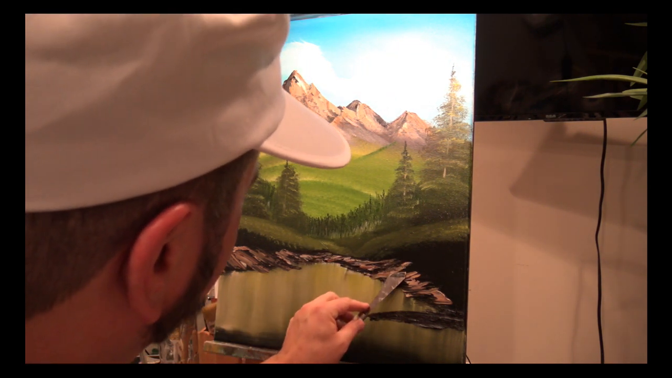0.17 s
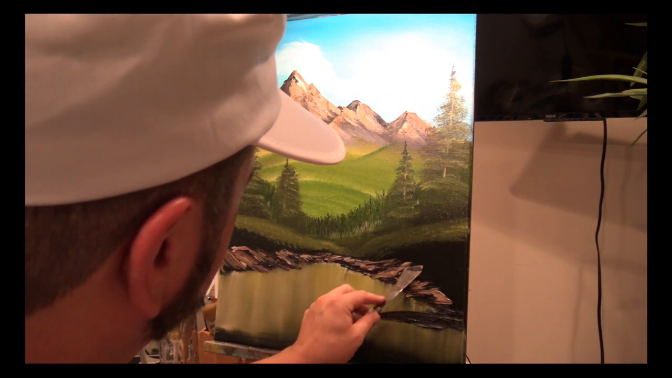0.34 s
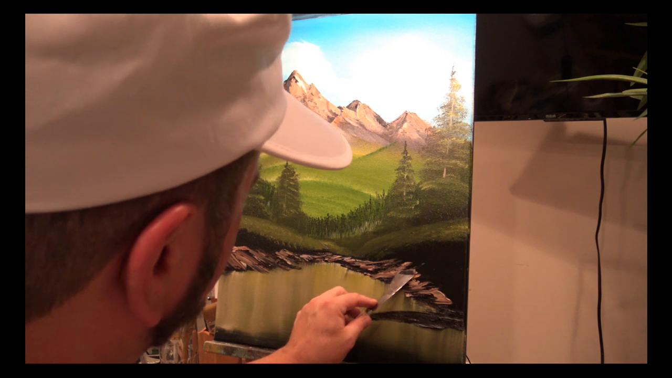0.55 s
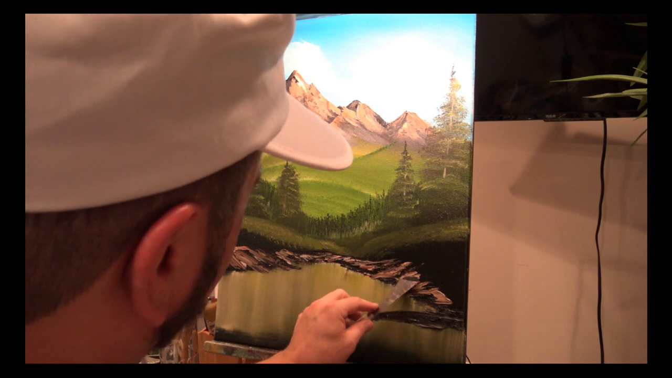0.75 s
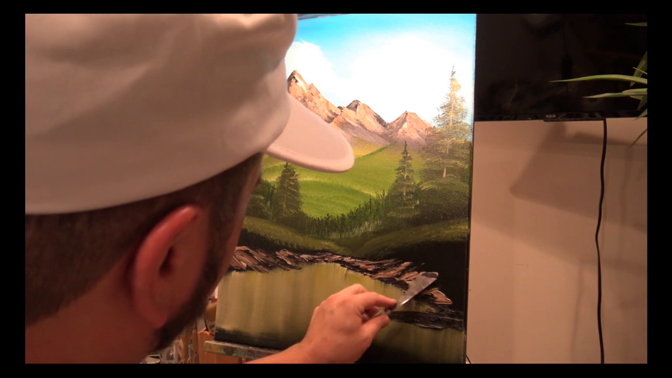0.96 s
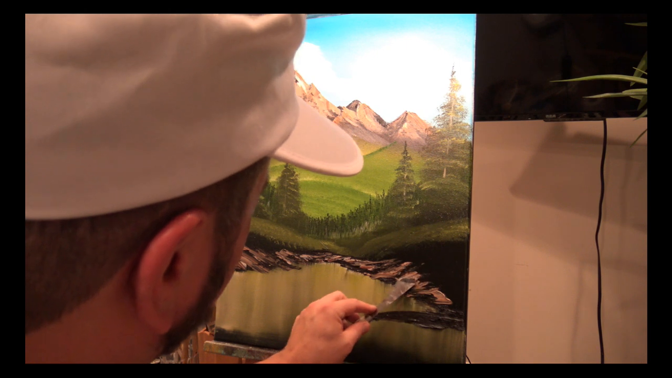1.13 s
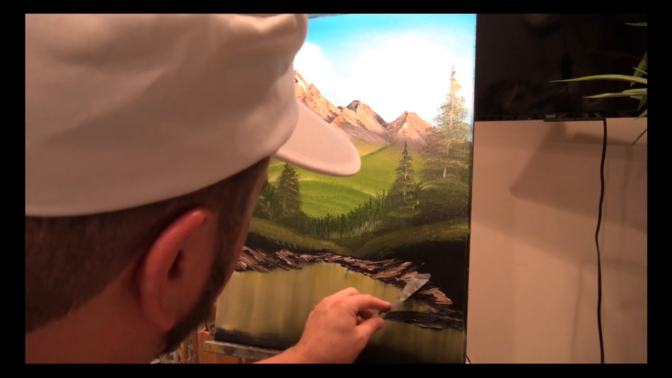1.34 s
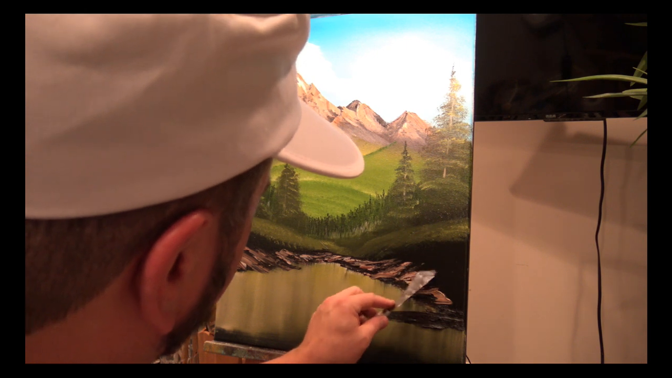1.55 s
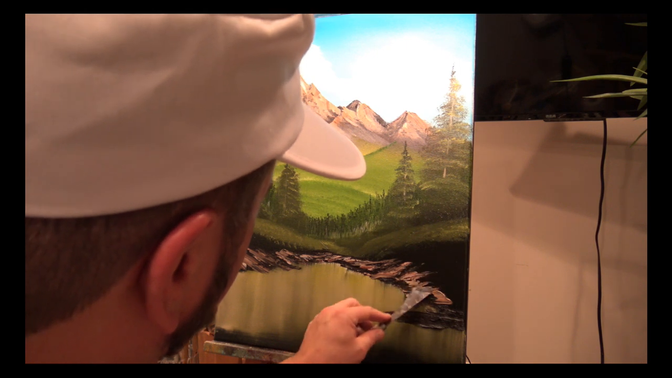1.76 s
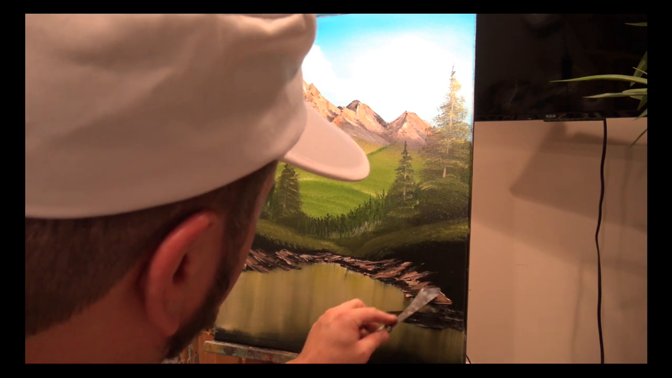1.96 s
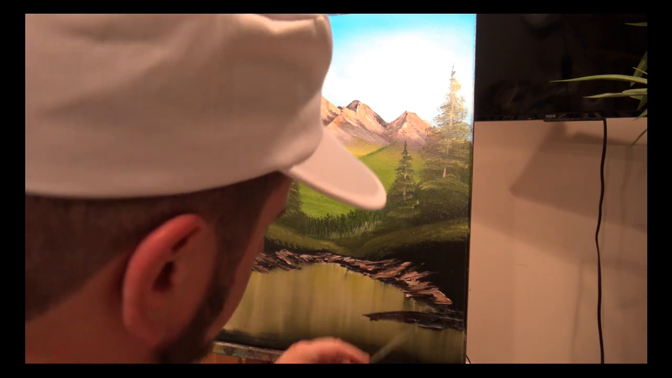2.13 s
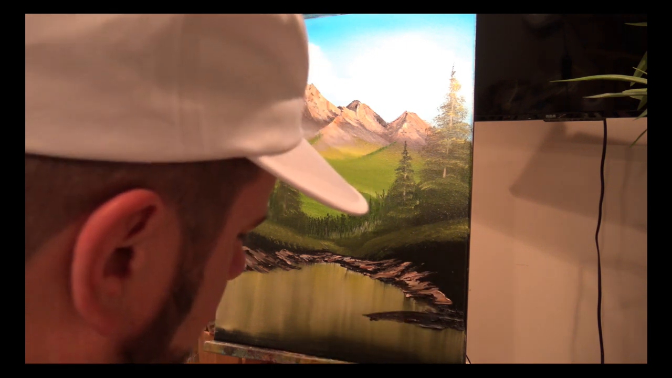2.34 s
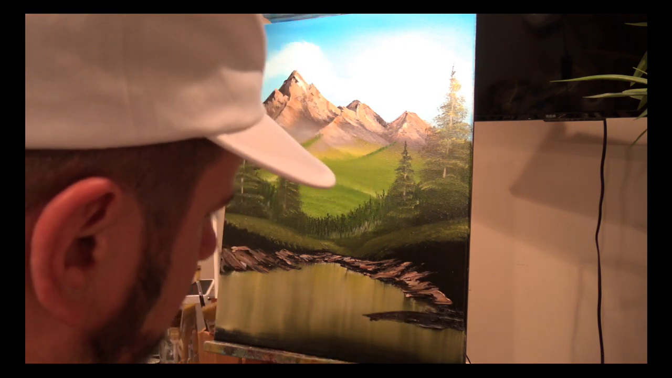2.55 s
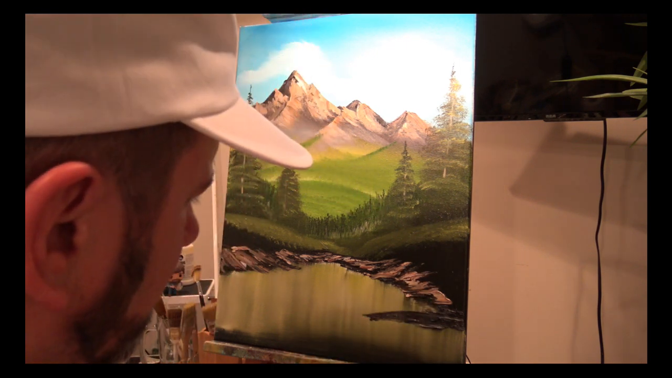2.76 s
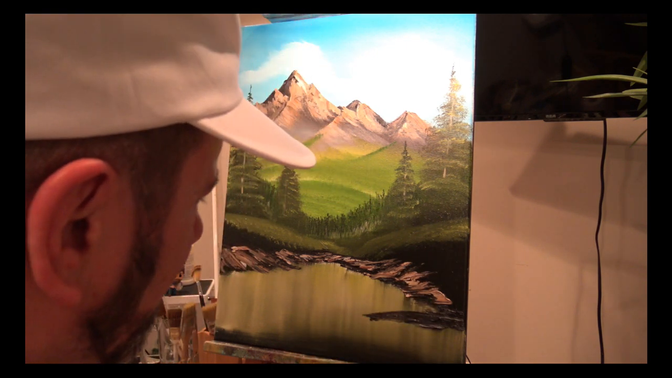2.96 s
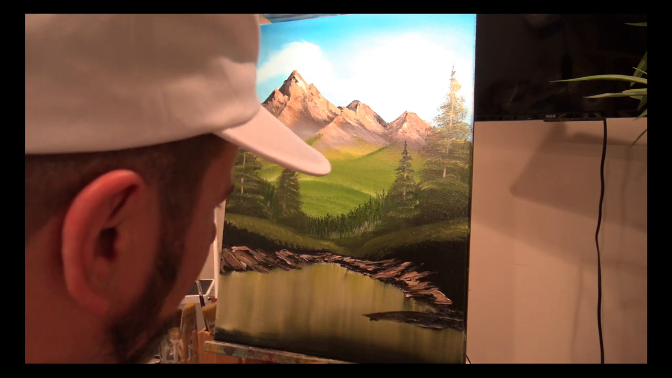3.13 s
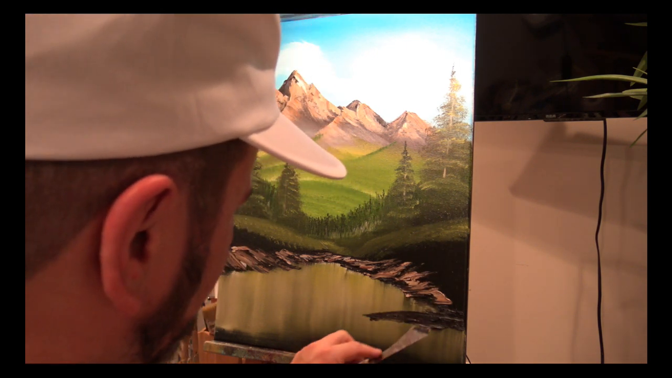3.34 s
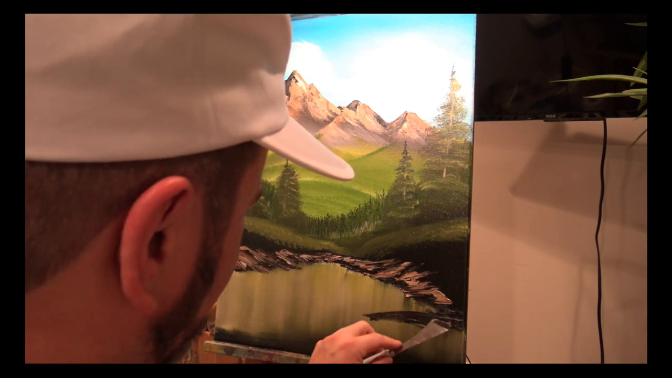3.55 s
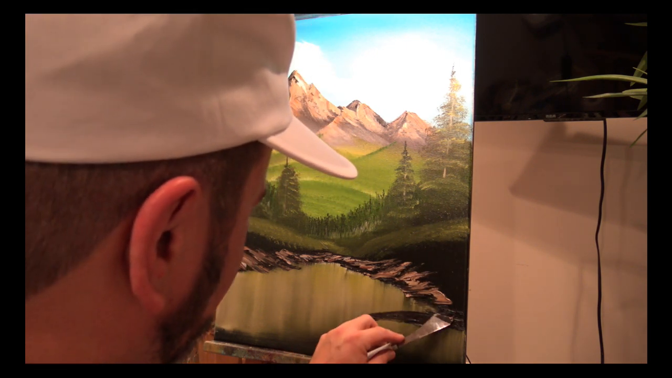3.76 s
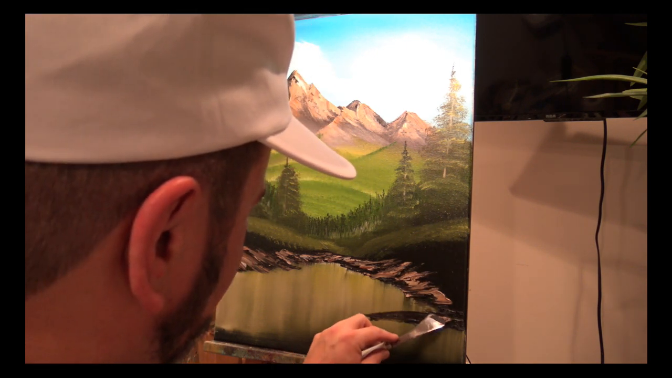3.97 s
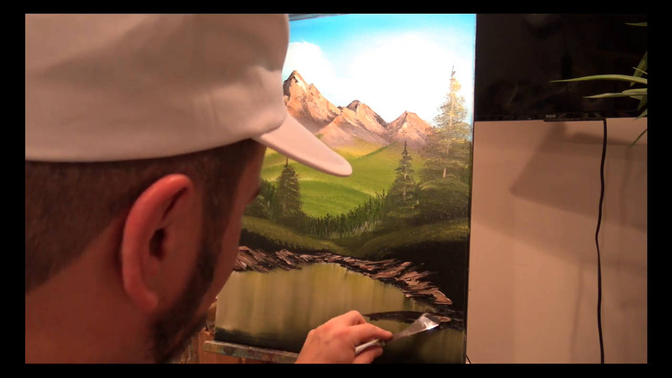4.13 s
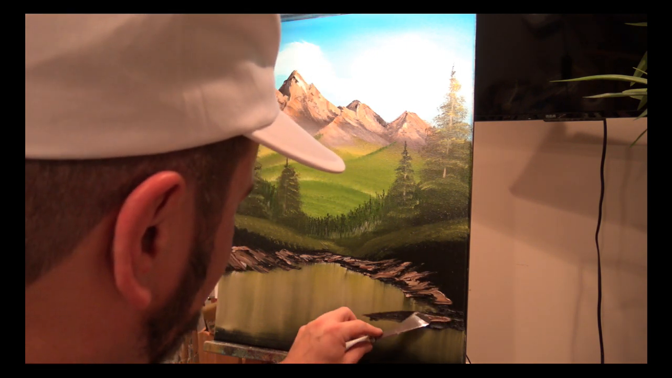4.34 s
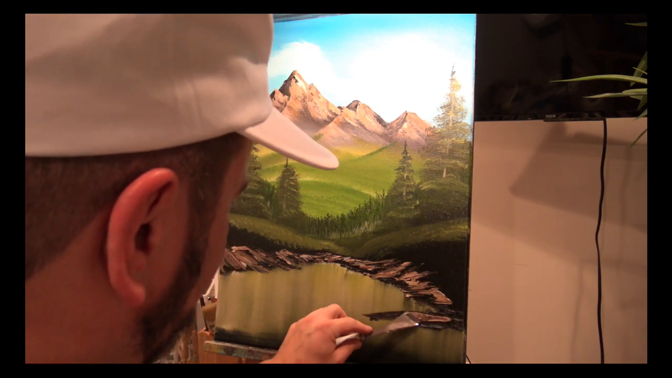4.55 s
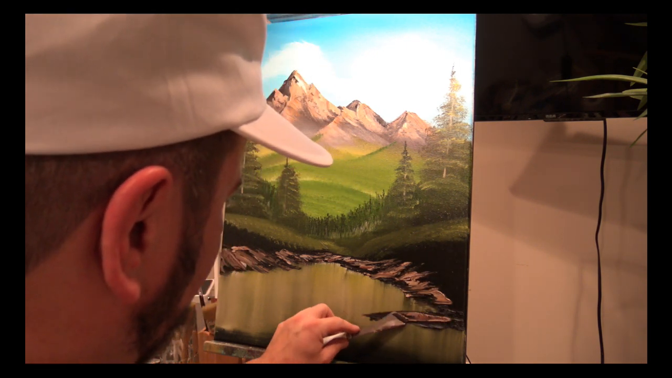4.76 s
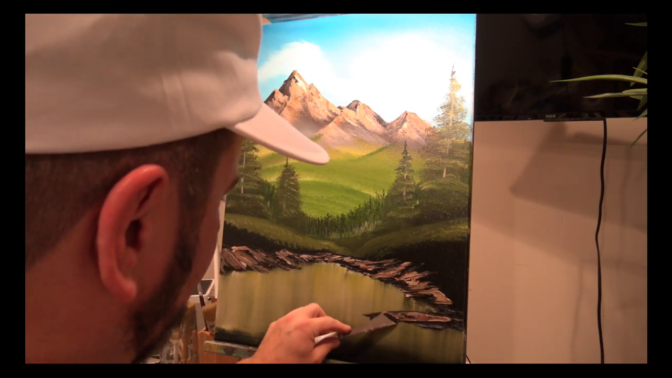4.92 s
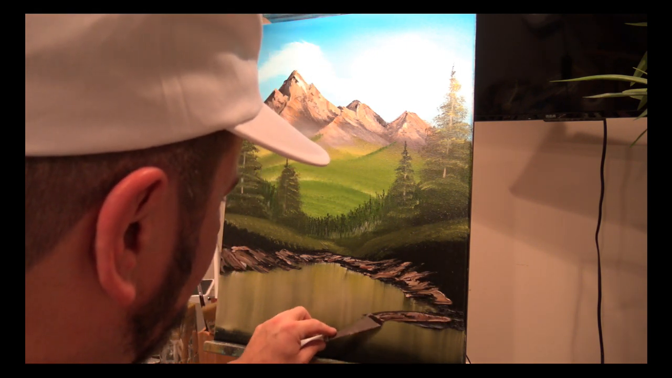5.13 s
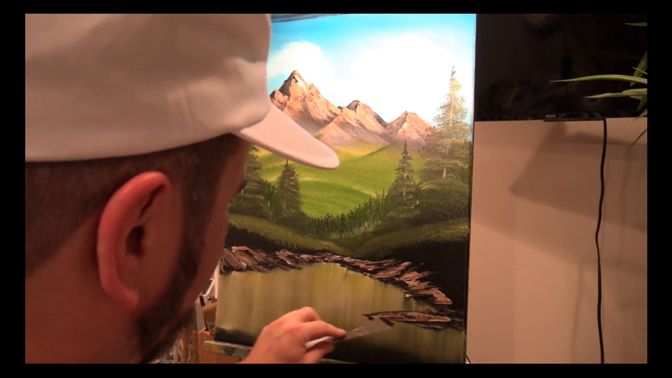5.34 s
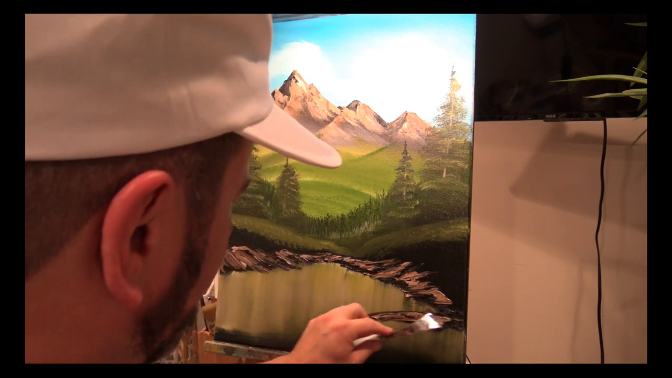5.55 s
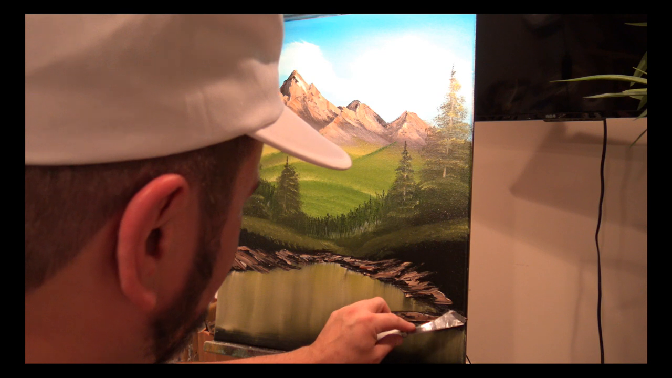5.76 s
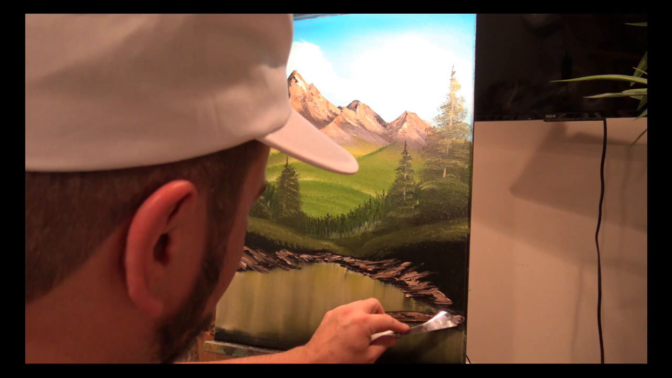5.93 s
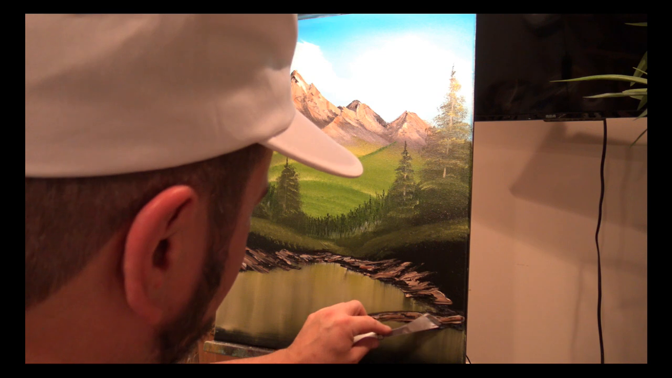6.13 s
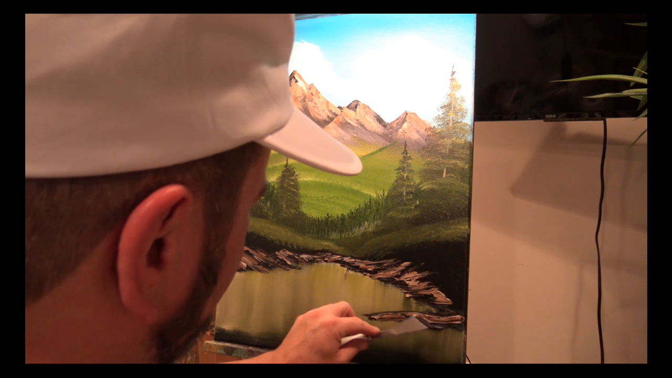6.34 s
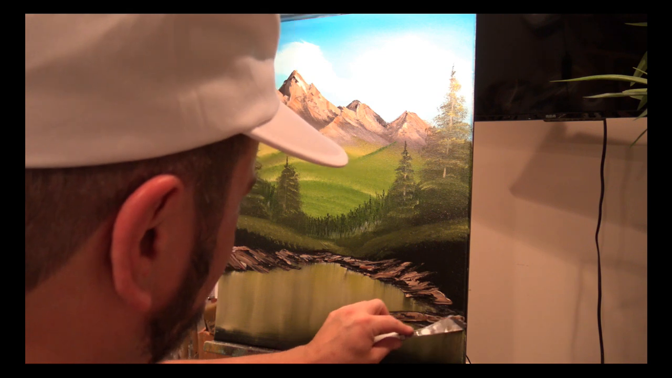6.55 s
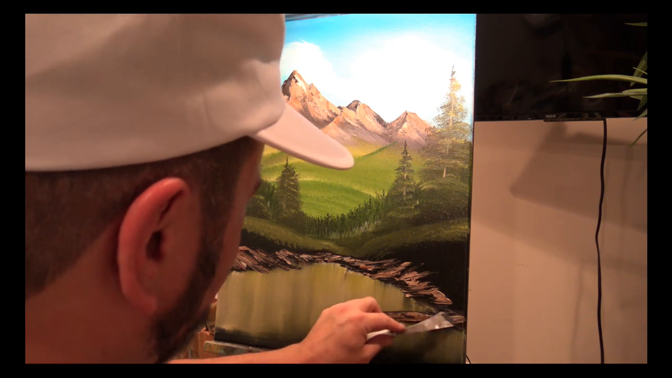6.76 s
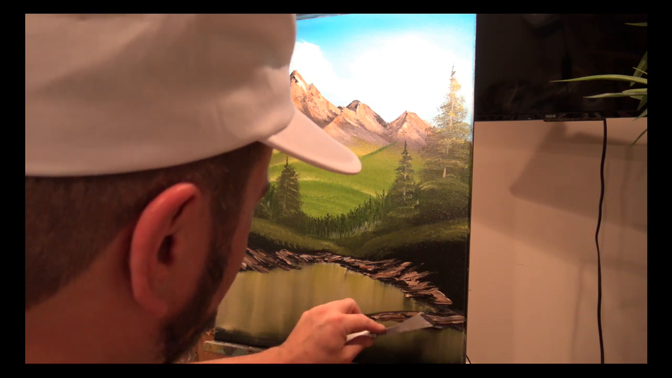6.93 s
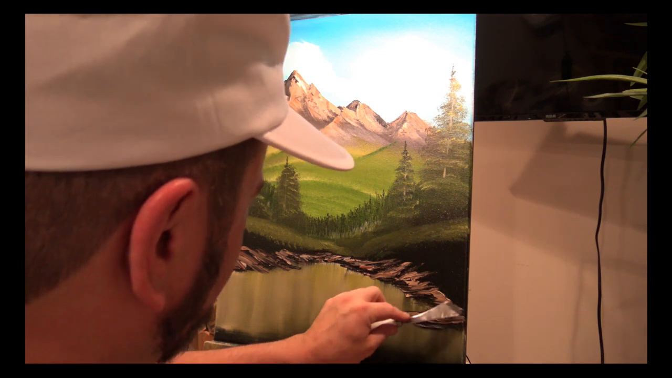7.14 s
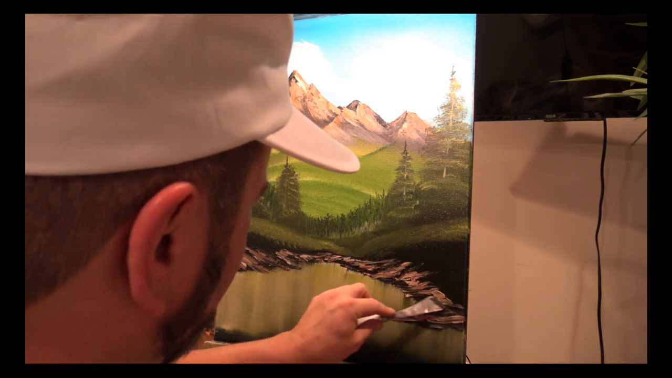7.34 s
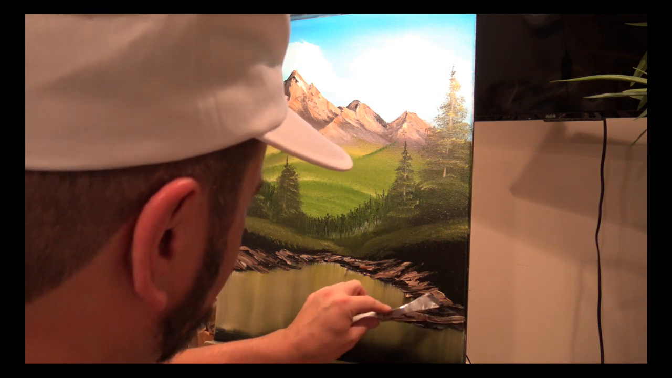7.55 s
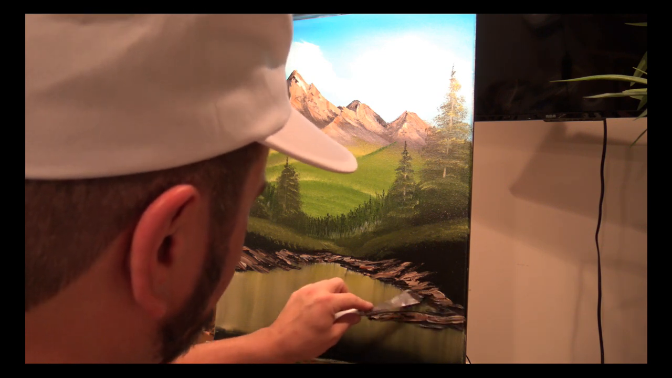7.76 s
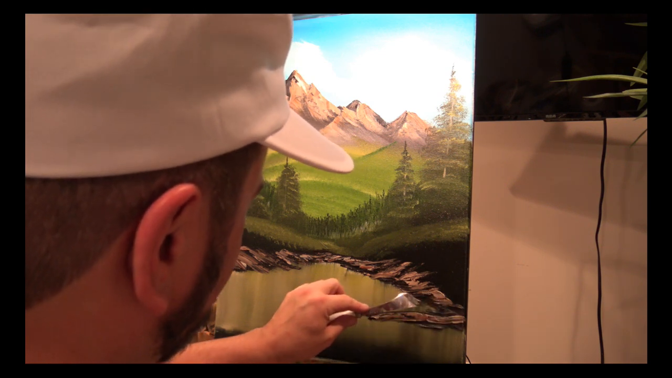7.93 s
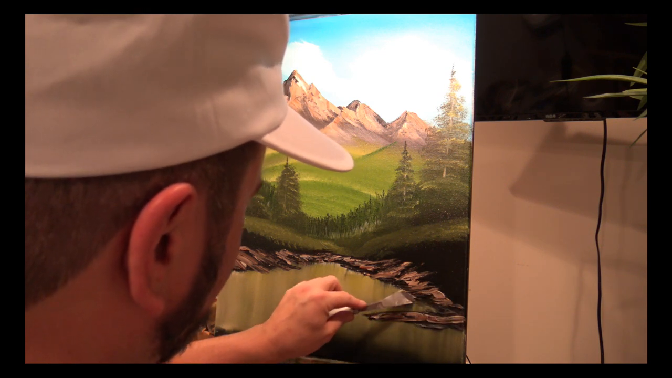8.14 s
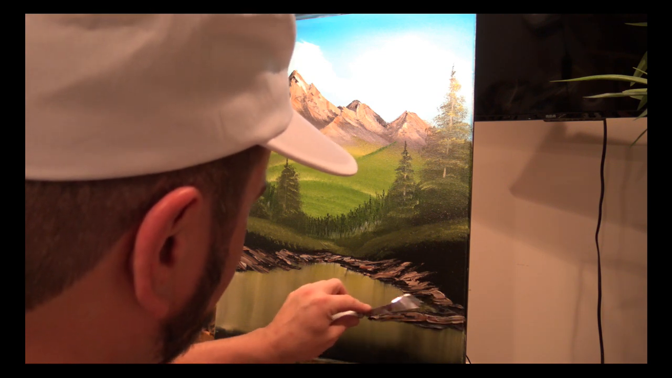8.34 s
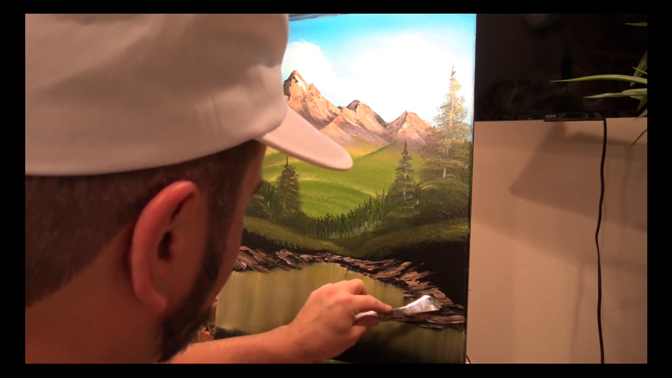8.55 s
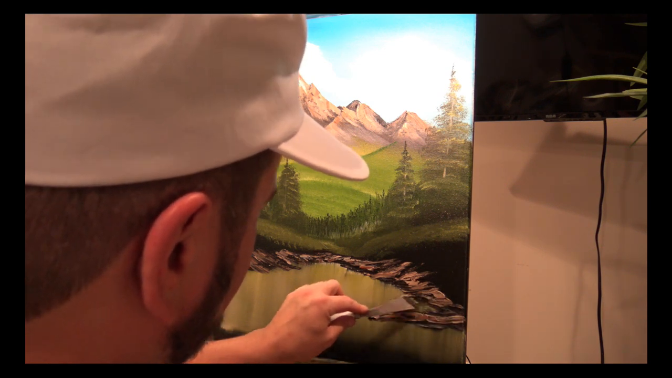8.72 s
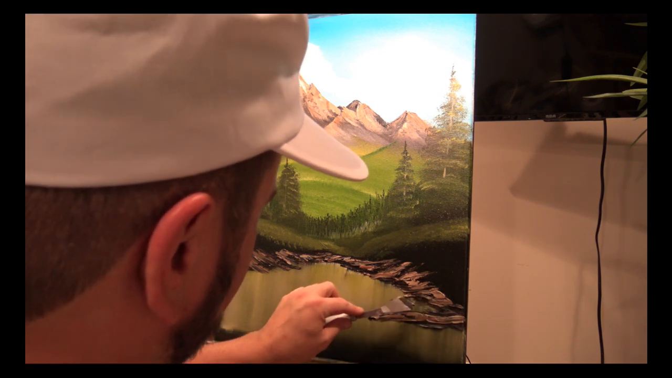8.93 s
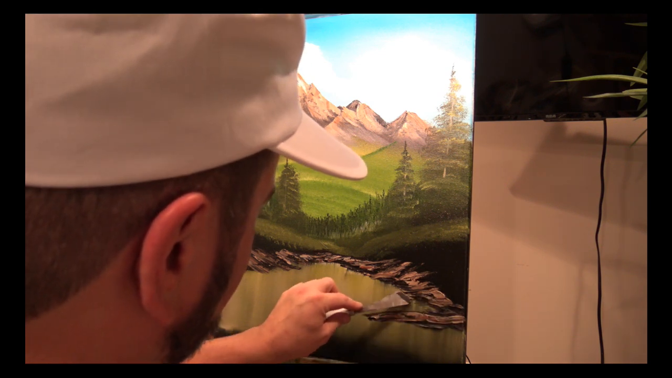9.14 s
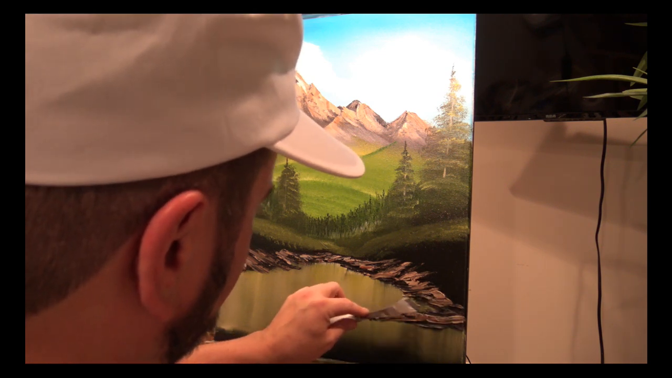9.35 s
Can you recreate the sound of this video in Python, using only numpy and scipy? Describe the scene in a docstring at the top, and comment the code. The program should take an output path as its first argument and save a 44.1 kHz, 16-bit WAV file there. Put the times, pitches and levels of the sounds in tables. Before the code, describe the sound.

A metal palette knife scrapes oil paint over a drumming canvas, interrupted by three sharp slaps and singing scrapes on a hard palette.

```python
"""A steel palette knife drags oil paint over a stretched canvas in short strokes, in a quiet room.
Random slips of the edge ring the canvas low and hiss high; single resonances stand out briefly, from low
booms and a knock to higher tones; landings tap and knock. Between two passages the knife is slapped onto a
hard palette and drawn across it three times, singing; then it ticks off sticky paint.
Steady hum and air, a rustling sleeve and handling rumble lie below."""
import sys
import numpy as np
from scipy import signal
from scipy.fft import rfft, irfft, next_fast_len
from scipy.io import wavfile

SR = 44100
rng = np.random.default_rng(int(sys.argv[2]) if len(sys.argv) > 2 else 0)


def wav_record(signal):
    """Record a signal, one row per channel, as 16-bit PCM in the file named by sys.argv[1]."""
    frames = np.transpose(np.atleast_2d(signal))
    bounded = np.clip(frames, -1, 1)
    # unit amplitude maps onto the largest positive 16-bit level
    quanta = np.round(bounded * 32767).astype(np.int16)
    wavfile.write(sys.argv[1], SR, quanta)


N = 418509

# canvas resonances: centre_hz, width_hz, relative_db
CANVAS_MODES = [(122, 35, -3), (330, 55, 0), (405, 40, -1), (482, 48, 0), (770, 70, -7), (900, 50, -8),
                (1210, 60, -9), (1440, 55, -5), (1700, 90, -12), (2080, 90, -13)]
# palette board resonances: centre_hz, width_hz, relative_db
BOARD_MODES = [(480, 260, -7), (822, 85, 2.5), (1127, 180, -8), (1460, 51, 3.5), (2345, 100, -8.5)]
# steel blade resonances: centre_hz, width_hz, relative_db
BLADE_MODES = [(4100, 500, -11), (6150, 250, -3), (7700, 200, -3), (8370, 200, -2), (9700, 400, -5),
               (11500, 2000, -9)]


def from_db(db):
    """Decibels to amplitude gain."""
    return 10 ** (np.asarray(db) / 20)


def rms_one(x):
    """Scale to rms 1."""
    return x / np.sqrt(np.mean(x ** 2) + 1e-20)


def lowpass(x, cut_hz):
    """Second-order low-pass run both ways, so without delay."""
    return signal.sosfiltfilt(signal.butter(2, cut_hz, fs=SR, output="sos"), x)


def gains(rows):
    """One gain curve per dB column; -120 dB outside the table."""
    s, *columns = np.transpose(rows)
    time_s = np.arange(N) / SR
    return [from_db(np.interp(time_s, s, db, left=-120, right=-120)) for db in columns]


def drift(rate_hz):
    """Slow random curve of rms 1: noise through two equal poles, computed every 40 samples."""
    r = np.exp(-80 * np.pi * rate_hz / SR)
    noise = rng.standard_normal(N // 40 + 2002)
    slow = signal.lfilter([1], [1, -2 * r, r * r], noise)[2000:]   # drop the filter's start
    return np.interp(np.arange(N) / 40, np.arange(len(slow)), rms_one(slow))


def catches(per_s, spread_db, clump_db):
    """Tiny slips of the edge: impulses at random moments, uneven in size, loud in clumps; rms 1."""
    sizes = from_db(spread_db * np.minimum(rng.exponential(1, N), 4)) * rng.choice([-1, 1], N)
    struck = rng.random(N) < per_s / SR
    clumps = from_db(clump_db * 2 * np.tanh(drift(46) / 2))
    return rms_one(sizes * struck * clumps)


def coloured(x, spectrum, patchy_db):
    """Shape the spectrum; overlapping octave bands flicker each on their own; rms 1."""
    size = next_fast_len(N)
    octave = np.log2(np.maximum(np.arange(size // 2 + 1) * SR / size, 10))
    hz, db = np.transpose(spectrum)
    lowest = np.log2(hz[0])
    shaped = rfft(x, size) * from_db(np.interp(octave, np.log2(hz), db)) * (octave > lowest)
    total = np.zeros(N)
    for centre in np.arange(np.floor(lowest), 15):
        band = irfft(shaped * np.maximum(1 - abs(octave - centre), 0), size)[:N]
        total += band * from_db(patchy_db * drift(37))
    return rms_one(total)


def resonance(x, hz, width_hz):
    """Two-pole resonance with gain 1 on top."""
    r = np.exp(-np.pi * width_hz / SR)
    zeros = np.array([1, 0, -1]) * (1 - r * r) / 2
    poles = [1, -2 * r * np.cos(2 * np.pi * hz / SR), r * r]
    return signal.lfilter(zeros, poles, x + 1e-18)


def body(x, modes, wander_db):
    """Parallel resonances; each is driven more or less as the contact point moves."""
    total = np.zeros(N)
    for k, (hz, width_hz, db) in enumerate(modes):
        drive = x * from_db(wander_db * np.tanh(drift(15.0)))
        total += (-1) ** k * from_db(db) * resonance(drive, hz, width_hz)
    return total


def arches(touch_s, swell_s, fade_s, peak_db, shape):
    """Gain of a series of contacts: each sets in, swells to its peak, fades, lifts and dies away.

    shape: onset_db_per_s, touch_db under peak, lift_db under peak, roundness (1 pointed - 2 domed), decay_db_per_s
    """
    onset_db_per_s, touch_db, lift_db, roundness, decay_db_per_s = shape
    s = np.arange(0, N + 32, 32) / SR
    since = s[:, None] - touch_s
    rising = np.clip(1 - since / np.maximum(swell_s, .001), 0, 1)
    falling = np.clip((since - swell_s) / np.maximum(fade_s, .001), 0, 1)
    before_touch_s = np.maximum(-since, 0)
    after_lift_s = np.maximum(since - swell_s - fade_s, 0)
    db = (peak_db - touch_db * rising ** roundness - lift_db * falling ** roundness
          - onset_db_per_s * before_touch_s - decay_db_per_s * after_lift_s)
    power = np.sum(from_db(2 * db), axis=1)
    return np.interp(np.arange(N) / SR, s, np.sqrt(power))


def scrape(gain, slips, modes, broad, ring_db, patchy_db, wander_db):
    """Slips under a stroke ring the modes and sound broadly."""
    ringing = rms_one(body(slips, modes, wander_db))
    return gain * rms_one(coloured(slips, broad, patchy_db) + from_db(ring_db) * ringing)


def blows(events, low_modes, push_hz, ring_db, crack_s, crack_db, blade_db):
    """Each landing: a soft push, the body ringing, a short bright crack that rings the blade."""
    s, level_db, bright_db = np.transpose(events)
    low, high = np.zeros((2, N))
    at = (s * SR).astype(int)
    low[at] = from_db(level_db)
    high[at] = from_db(level_db + bright_db + crack_db)
    n = np.arange(300) * 2 * np.pi * push_hz / SR
    pulse = np.e * n * np.exp(-n) * (1 - n / 2)   # with its rebound, no net push
    push = np.convolve(low, pulse)[:N]
    decay = signal.lfilter([1], [1, -np.exp(-1 / (crack_s * SR))], high)
    crack = decay * rng.standard_normal(N)
    ringing = from_db(ring_db) * body(push, low_modes, wander_db=0.5)
    blade = from_db(blade_db) * body(crack, BLADE_MODES, wander_db=4.0)
    return push + ringing + crack + blade


def slackness(x):
    """The low registers of the canvas grow where the cloth is slack, shrink where it is tight."""
    # start_s, sway_db (below 200 Hz), boom_db (200-600 Hz), thud_db (600-1200 Hz)
    slack_rows = [(0, 4.5, 3, -0.5), (1.6, -4.5, 0, -9.5), (4.9, -1, 2.5, -1), (5.8, 6, -5, -17),
                  (7.1, -3, 7, 10), (7.55, -17, -2.5, -9), (8.5, -5, -1, -9), (9.399, 1, 2, 2.5)]
    sway, boom, thud = gains([*slack_rows, (N / SR, *slack_rows[-1][1:])])   # hold the last row
    below_200, below_600, below_1200 = [lowpass(x, hz) for hz in (200, 600, 1200)]
    lows = sway * below_200 + boom * (below_600 - below_200) + thud * (below_1200 - below_600)
    return lows + x - below_1200


def canvas_strokes():
    """The blade catches on the weave: snags drum the canvas, finer grit rasps and hisses at the edge."""
    # touch_s, swell_s, fade_s, drum_db, rasp_db (edge below rasp_top_hz), hiss_db (edge above it)
    stroke_rows = [(0.0, 0.0015, 0.2, -27.5, -49, -43), (0.039, 0.12, 0.077, -25, -24, -34),
                   (0.249, 0.072, 0.14, -23, -30, -35), (0.436, 0.0047, 0.055, -33.5, -28, -40.5),
                   (.59, 0.06, 0.31, -26, -35, -37.5), (0.819, 0.053, 0.17, -26, -31.5, -35.5),
                   (1.063, 0.11, 0.2, -22, -32, -35.5), (1.503, 0.12, 0.19, -21, -33, -33),
                   (1.748, 0.0011, 0.058, -47, -36, -26.5), (1.967, 0.0095, 0.14, -65, -60, -41),
                   (3.602, 0.0044, 0.052, -41, -64, -68), (3.75, 0.015, 0.094, -45.5, -46.5, -54),
                   (4.329, 0.01, 0.35, -81, -59, -50), (4.49, 0.022, 0.071, -56, -52, -47.5),
                   (4.619, 0.042, 0.46, -47, -47, -46.5), (4.74, 0.254, 0.034, -37, -39, -40),
                   (5.64, 0.046, 0.75, -44.5, -46, -44.5), (5.77, 0.072, 0.024, -36, -41, -45.5),
                   (6.475, 0.022, 0.021, -60, -45, -51), (6.528, 0.019, 0.023, -60, -46, -42),
                   (6.56, 0.029, 0.052, -53, -46, -47), (6.754, 0.013, 0.13, -51.5, -49, -51),
                   (7.021, 0.12, 0.086, -41.5, -36, -35), (7.463, 0.12, 0.014, -25.5, -32.5, -34.5),
                   (7.75, 0.026, 0.11, -42, -46.5, -47.5), (7.884, 0.0021, 0.11, -25, -33.5, -41),
                   (7.91, 0.047, 0.034, -31.5, -38.5, -39.5), (8.294, 0.0019, 0.035, -31, -44, -57),
                   (8.343, 0.18, 0.021, -28, -34, -35), (8.755, 0.022, 0.12, -47, -51.5, -50),
                   (8.902, 0.088, 0.022, -33.5, -36, -41), (9.348, 0.0019, 0.044, -36.5, -41, -49),
                   (9.385, 0.069, 0.14, -37, -38, -38.5)]
    # broad canvas spectrum: frequency_hz, relative_db
    weave = [(50, 19), (110, 6), (350, -0.5), (900, 21), (2200, -21.5), (4000, -47)]
    # edge on paint spectrum: frequency_hz, relative_db
    paint_edge = [(1200, -15), (2200, -0.5), (4500, -7), (6200, -8.5), (9200, -10), (10500, -18.5),
                  (13000, -14.5), (16000, -23)]
    # flexing blade colours the edge: centre_hz, width_hz, relative_db
    flex_modes = [(1430, 90, 0), (2250, 160, -3)]
    rasp_top_hz = 3360
    drum_shape, edge_shape = (3400, 17.4, 29.3, 1.27, 540), (1500, 13.8, 31.5, 1.61, 680)
    s, swell_s, fade_s, drum_db, rasp_db, hiss_db = np.transpose(stroke_rows)
    drum = arches(s, swell_s, fade_s, drum_db, drum_shape)
    rasp = arches(s, swell_s, fade_s, rasp_db, edge_shape)
    hiss = arches(s, swell_s, fade_s, hiss_db, edge_shape)
    snags = catches(1400, 4.0, 1.8)
    drumming = scrape(drum, snags, CANVAS_MODES, weave, ring_db=8, patchy_db=1.5, wander_db=4.0)
    grit = catches(7000, 3.5, 1.5) + .5 * snags
    edge = scrape(1, grit, flex_modes, paint_edge, ring_db=-8, patchy_db=2.0, wander_db=6.0)
    edge_low = lowpass(edge, rasp_top_hz)
    return slackness(drumming) + rasp * edge_low + hiss * (edge - edge_low)


def canvas_blows():
    """The blade lands or snags and the hand bumps: pushes ring the canvas, cracks ring the blade."""
    # blade lands, once snags: start_s, level_db, brightness_db
    tap_rows = [(.4366, -15, -32), (.6022, -18.5, -10), (.827, -21, -2), (1.5137, -11, -5.5),
                (1.6086, -11, -22), (1.7519, -14.5, -14), (1.9668, -23, -1), (4.884, -33, 2),
                (4.994, -20.5, -7), (5.0438, -25.5, -1), (7.8825, -4.5, -18), (8.2965, -34, 4),
                (8.9022, -19, -24), (8.948, -21, -7), (9.3493, -19.5, -28)]
    # hand bumps the canvas: start_s, level_db, brightness_db
    knock_rows = [(1.089, -29.5, -32), (1.268, -36, -25), (3.6018, -30.5, -30), (5.562, -40.5, -21)]
    taps = blows(tap_rows, CANVAS_MODES, push_hz=1310, ring_db=11.5,
                 crack_s=0.014, crack_db=-13.0, blade_db=-7)
    knocks = blows(knock_rows, CANVAS_MODES, push_hz=500, ring_db=24,
                   crack_s=.01, crack_db=0, blade_db=-6)
    return taps + knocks


def room(x):
    """A tail of dense echoes: decaying noise, convolved with the knife sounds."""
    t60_s, level_db, wall_cut_hz = 0.29, -9.5, 22000
    t = np.arange(int(.5 * SR)) / SR
    tail = rng.standard_normal(len(t)) * from_db(-60 * t / t60_s) * (t > .004)
    tail = signal.sosfilt(signal.butter(1, wall_cut_hz, fs=SR, output="sos"), tail)
    return from_db(level_db) * signal.fftconvolve(x, tail / np.sqrt(np.sum(tail ** 2)))[:N]


def room_air():
    """Steady background noise, strongest in the lows."""
    # frequency_hz, relative_db
    air_spectrum = [(20, 4), (60, 0), (100, -3.5), (200, -6), (500, -11.5), (760, -14.5), (960, -9.5),
                    (1250, -20), (2750, -24.5), (8000, -28.5), (16000, -32)]
    return from_db(-46.5) * coloured(rng.standard_normal(N), air_spectrum, patchy_db=0.0)


def hum():
    """A low sine whose level drifts slightly."""
    hum_hz, rms_db = 59.5, -53
    sine = np.sqrt(2) * np.sin(2 * np.pi * hum_hz * np.arange(N) / SR)
    return from_db(rms_db + 0.78 * drift(3.6)) * sine


def sleeve():
    """Cloth rustles as the arm moves: dense small slips, coloured."""
    # start_s, level_db
    rustle_rows = [(1.7, -55), (1.85, -43), (2.25, -42.5), (2.9, -54), (3.2, -50), (3.6, -83)]
    # frequency_hz, relative_db
    cloth_spectrum = [(60, -32), (110, 20.5), (242, 16), (900, 14), (1150, 6.5), (1700, 11.5), (2300, 3.5),
                      (4000, -7)]
    return gains(rustle_rows)[0] * coloured(catches(3000, 1.2, 0.9), cloth_spectrum, patchy_db=1.5)


def palette():
    """Slaps and draws on the hard board: slips rub the board and rasp the blade, whose edge sings."""
    # start_s, slap_db, brightness_db, chatter_db, draw_s, fade_s, rasp_db, sing_delay_s, sing_db, sing_hz,
    # board_swell_s, board_fade_s, board_db
    draw_rows = [(2.2466, 4.006, 9.5, -18.5, 0.079, 0.024, -18.5, 0.035, -17, 8960, 0.026, 0.021, -19.5),
                 (2.438, 3.5, -0.5, -19, 0.085, 0.053, -17, 0.066, -14.5, 9400, 0.0028, 0.096, -13),
                 (2.6308, 4.998, 1.5, -15, 0.12, 0.05, -18.5, 0.09, -15.5, 8100, 0.02, 0.11, -18.5)]
    # edge on board spectrum: frequency_hz, relative_db
    hard_edge = [(1500, -14.5), (2800, -13), (5000, -6.5), (7000, -2.5), (9800, -11), (11400, -11),
                 (16000, -29)]
    # broad board spectrum: frequency_hz, relative_db
    board_spectrum = [(150, -6.5), (550, -3), (1600, -3.5), (3500, -10), (5000, -41.5)]
    rub_shape, rasp_shape = (15000, 10, 19, 1, 127), (17000, 4, 6.8, 1.2, 175)
    chatter_s, chatter_shape = 0.028, (11000, 3, 6.2, 1.3, 350)
    sing_width_hz, sing_air_db = 2800, 0
    sing_fade_s, sing_shape = .006, (1500, 3, 6, 1.5, 900)   # stops short
    (s, slap_db, bright_db, chatter_db, draw_s, fade_s, rasp_db, delay_s, sing_db, sing_hz,
     board_swell_s, board_fade_s, board_db) = np.transpose(draw_rows)

    board_gain = arches(s, board_swell_s, board_fade_s, board_db, rub_shape)
    rub = scrape(board_gain, catches(5000, 3.0, 1.5), BOARD_MODES, board_spectrum,
                 ring_db=2, patchy_db=1.5, wander_db=4.5)

    draw_gain = arches(s, draw_s, fade_s, rasp_db, rasp_shape)
    chatter_gain = arches(s, .002, chatter_s, chatter_db, chatter_shape)   # after each slap
    grit = catches(8000, 3.2, 1.5)
    rasp = scrape(np.hypot(draw_gain, chatter_gain), grit, BLADE_MODES, hard_edge,
                  ring_db=-7, patchy_db=2.2, wander_db=7.0)

    bright_air = from_db(sing_air_db) * rms_one(np.gradient(grit))
    sing = np.zeros(N)
    for start_s, length_s, db, hz in zip(s + delay_s, draw_s - delay_s, sing_db, sing_hz):
        tone = rms_one(resonance(resonance(grit, hz, sing_width_hz), hz, sing_width_hz))
        sing += arches(start_s, length_s, sing_fade_s, db, sing_shape) * (tone + bright_air)

    slaps = blows(np.transpose([s, slap_db, bright_db]), BOARD_MODES, push_hz=1420, ring_db=9.5,
                  crack_s=0.001, crack_db=-12.0, blade_db=11.0)
    return rub + rasp + sing + slaps


def rings():
    """Brief resonances stand out under the blade: low canvas booms, a knock, higher squeals."""
    # start_s, length_s, pitch_hz, width_hz, level_db
    ring_rows = [(2.708, 0.031, 2350, 260, -20.5), (4.84, 0.18, 480, 150, -37),
                 (5.722, 0.041, 248, 149, -36.5), (5.729, 0.063, 930, 120, -33),
                 (5.75, 0.048, 1830, 110, -38.5), (5.817, 0.024, 1270, 120, -37.5),
                 (5.824, 0.063, 1864, 80, -44), (5.9, 0.27, 1822, 68.8, -55.5),
                 (7.089, 0.027, 1520, 450, -34), (7.125, 0.031, 2950, 400, -34),
                 (8.41, 0.02, 2930, 600, -39), (7.517, 0.065, 475, 100, -33), (8.41, .1, 516, 150, -35.5),
                 (8.455, 0.056, 1520, 450, -28.5)]
    rise_share, shape = .5, (2000, 8, 9, 1.5, 700)   # share of the length spent swelling
    slips = catches(1500, 2.5, 2.0)
    total = np.zeros(N)
    for s, length_s, hz, width_hz, db in ring_rows:
        gain = arches(s, rise_share * length_s, (1 - rise_share) * length_s, db, shape)
        total += gain * rms_one(resonance(resonance(slips, hz, width_hz), hz, width_hz))
    return total


def rumble():
    """Low rumble of handling: sparse uneven bumps, coloured."""
    # start_s, level_db
    rumble_rows = [(2.8, -64), (2.95, -47), (3.2, -43.5), (3.55, -77)]
    # frequency_hz, relative_db
    rumble_spectrum = [(90, -17), (150, 7), (330, 8.5), (600, -34)]
    return gains(rumble_rows)[0] * coloured(catches(180, 2.7, 1.7), rumble_spectrum, patchy_db=1.5)


def sticky_ticks():
    """The blade peels off sticky paint: small bright blows that mostly ring the blade."""
    # start_s, level_db, brightness_db
    tick_rows = [(2.8861, -41, 14.5), (2.9801, -41, 7), (2.989, -46, 13), (3.014, -43, 13)]
    return blows(tick_rows, BOARD_MODES, push_hz=1500, ring_db=5,
                 crack_s=0.0028, crack_db=-9.5, blade_db=22.0)


def scene():
    """Knife sounds in the room, over sleeve, rumble, air and hum."""
    knife = canvas_strokes() + canvas_blows() + palette() + rings() + sticky_ticks()
    background = room_air() + hum() + sleeve() + rumble()
    return (knife + room(knife) + background)[None]


def record(dry):
    """Peaks beyond full scale are clipped; a steep low-pass cuts the top."""
    cutoff_hz = 15750
    full = np.clip(dry, -1, 1)
    return signal.sosfilt(signal.ellip(18, .3, 100, cutoff_hz, fs=SR, output="sos"), full)


dry = scene()
out = record(dry)
wav_record(out)
```